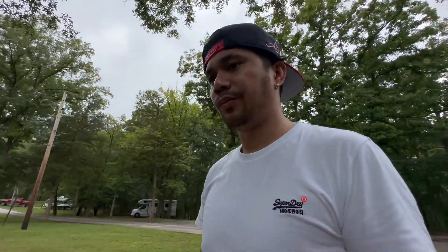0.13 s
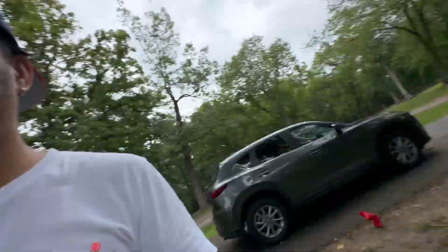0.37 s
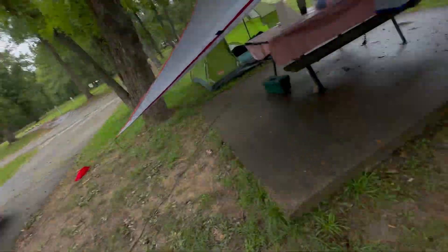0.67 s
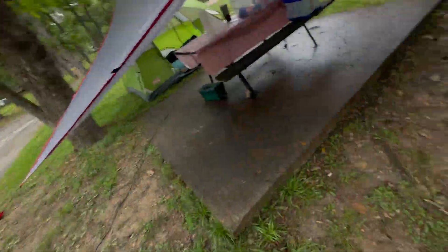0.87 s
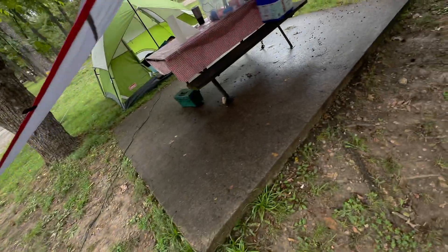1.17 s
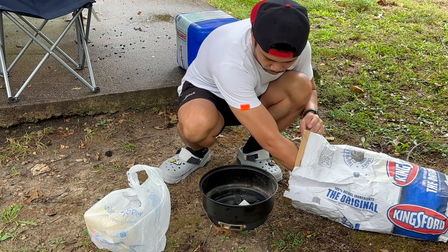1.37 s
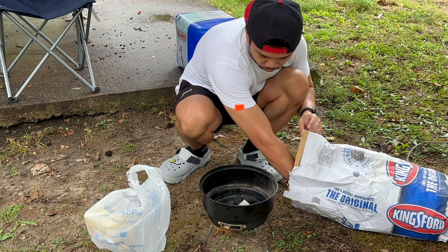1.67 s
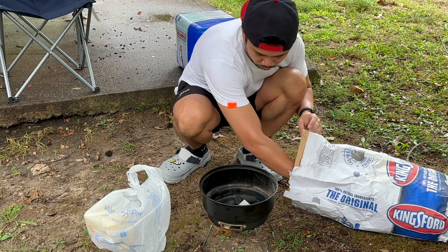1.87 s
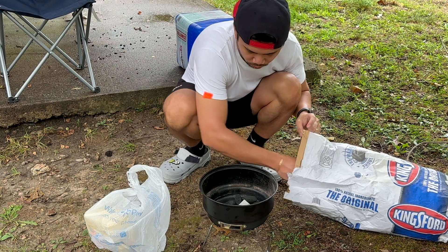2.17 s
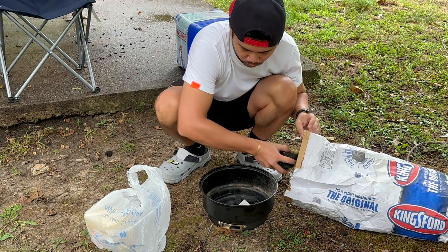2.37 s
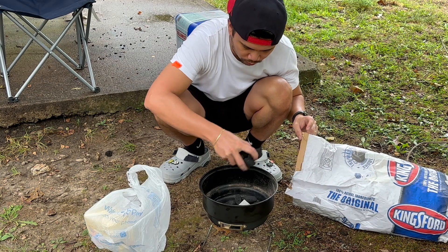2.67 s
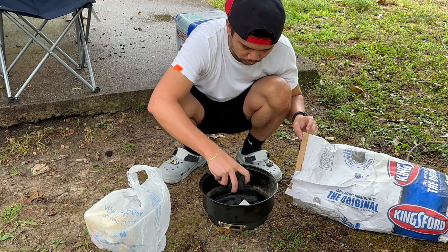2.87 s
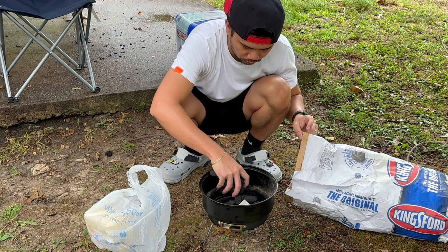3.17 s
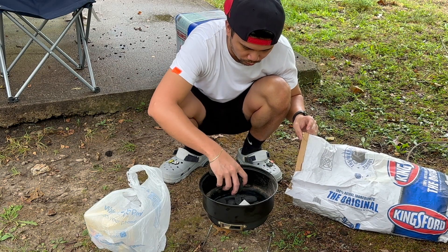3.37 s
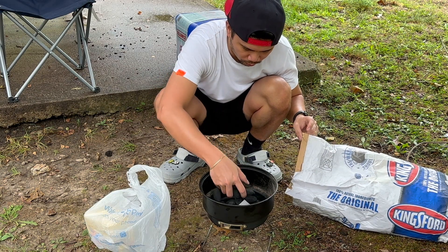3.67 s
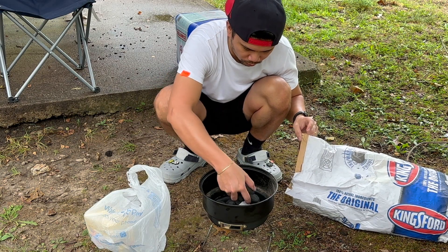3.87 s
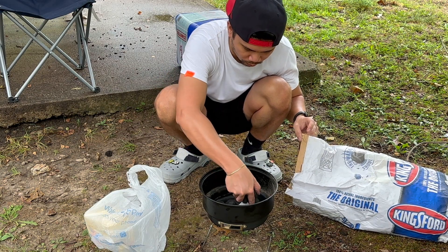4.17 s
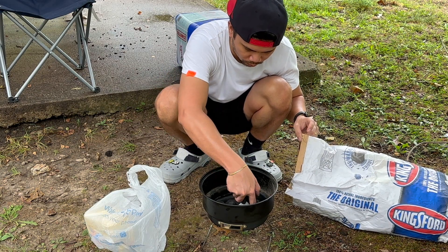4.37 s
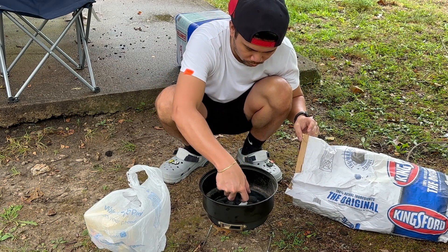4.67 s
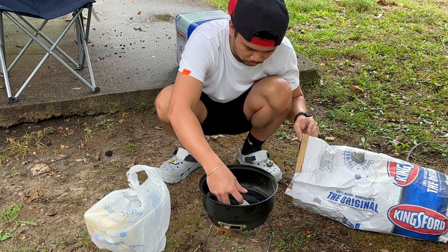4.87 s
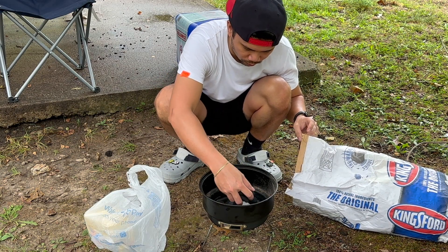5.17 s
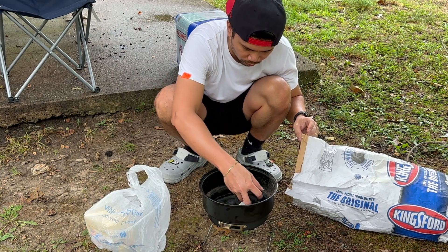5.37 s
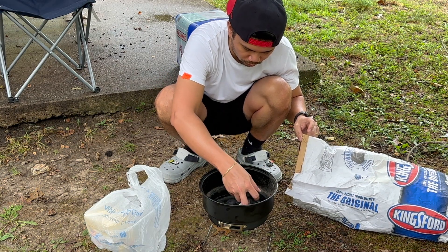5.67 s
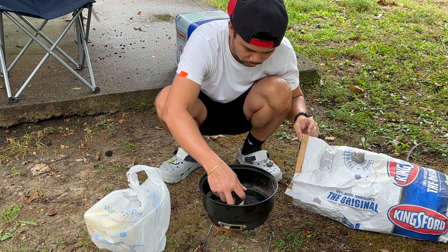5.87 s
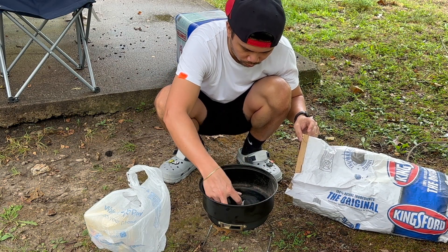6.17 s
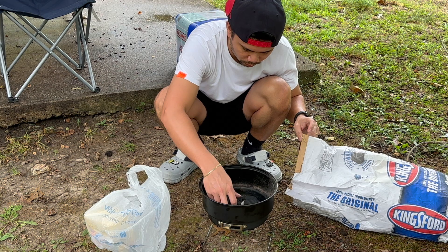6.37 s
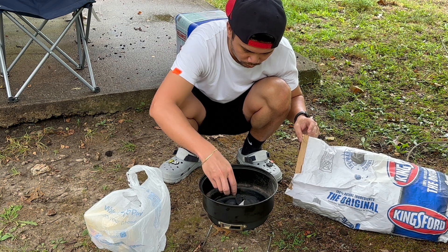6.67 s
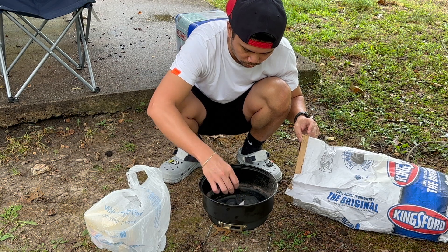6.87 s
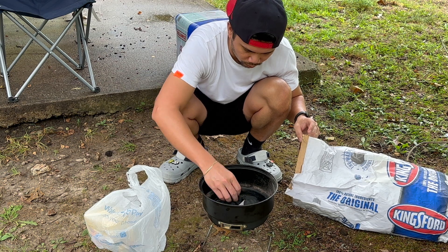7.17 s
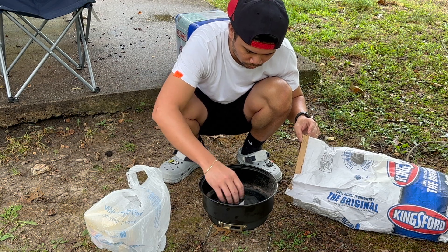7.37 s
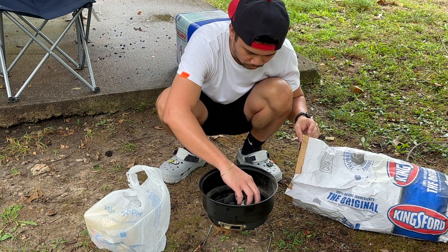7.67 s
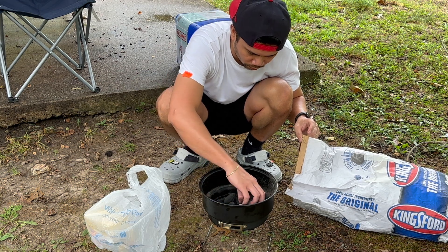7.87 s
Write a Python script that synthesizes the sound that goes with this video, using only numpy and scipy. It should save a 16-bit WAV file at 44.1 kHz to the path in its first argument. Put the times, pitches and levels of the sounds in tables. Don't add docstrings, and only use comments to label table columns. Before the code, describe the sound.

For the first 1.3 seconds, someone walks outdoors: low handling rumble, leafy rustle, soft grass brushes and little ticks of gear, strongest near 0.7. A hard cut at 1.3 brings a close stiff paper sack, crackling in clumps with hollow papery booms, dull coal knocks and a sharp snap near 1.5, until about 2.3. After a quieter gap, charcoal rolls and clatters in a thin steel bowl from 3.0 to 3.9, loudest in a bright clang at 3.6; a wire grate sings on until about 4.5. Muted gritty nudges follow, with a rim scrape at 4.85, then sparse faint touches. Another bright metallic clank comes at 6.75, trailed by small pings and muffled taps to 7.8. Throughout, distant engines hum low; far traffic, moving air and faint insect hiss accompany the grill. Close stereo pickup, open and nearly dry.

```python
import sys
import numpy as np
from scipy import signal
from scipy.fft import rfft, irfft, next_fast_len
from scipy.io import wavfile
from scipy.ndimage import uniform_filter1d, map_coordinates

SR = 44100
rng = np.random.default_rng(int(sys.argv[2]) if len(sys.argv) > 2 else 0)


def waveform_to_disk(signal):
    frames = np.transpose(np.atleast_2d(signal))
    scaled = np.clip(frames, -1, 1) * 32767
    samples = np.round(scaled).astype(np.int16)
    wavfile.write(sys.argv[1], SR, samples)


def voltage_ratio(level):
    return 10 ** (np.asarray(level, float) / 20)


N = 353682

# (time [s], peak [dB])
CHIMES = [(3.144, -45), (3.1747, -43), (3.3213, -33), (3.47, -46), (3.8449, -36), (6.9445, -45.5),
          (7.0404, -47.5), (7.1075, -52), (7.1726, -52)]


def unit(x):
    return x / np.sqrt(np.mean(x ** 2) + 1e-20)


def along(points, hz):
    f, v = np.transpose(points)
    return np.interp(np.log(hz + 1), np.log(f + 1), v)


def curves(rows):
    s, *cols = np.transpose(rows)
    return [np.interp(np.arange(N) / SR, s, c) for c in cols]


def wobble(rate):
    knots = rng.standard_normal(int(N * rate / SR) + 4)
    return map_coordinates(knots, [np.arange(N) * rate / SR])


def filtered(x, response):
    m = next_fast_len(x.shape[-1] + 8192)
    return irfft(rfft(x, m) * response(np.fft.rfftfreq(m, 1 / SR)), m)[..., :x.shape[-1]]


def resonances(modes):
    def response(f):
        return sum((-1) ** k * voltage_ratio(db) * 1j * f * w / (c * c - f * f + 1j * f * w)
                   for k, (c, w, db) in enumerate(modes))
    return response


def stereo(pair, spectrum, alike):
    def colour(hz):
        turn = np.arccos(np.clip(along(alike, hz), -1, 1)) / 2
        return voltage_ratio(along(spectrum, hz)) * [np.cos(turn), np.sin(turn)]
    mid, side = filtered(pair, colour)
    return unit(np.array([mid + side, mid - side]))


def rush(spectrum, alike, patchy_db, size=N):
    z = signal.stft(rng.standard_normal((2, size)), nperseg=512)[2]
    field = uniform_filter1d(rng.standard_normal(z.shape[1:]), 6, 0)
    field = uniform_filter1d(field, 14, 1)
    patches = voltage_ratio(patchy_db * np.clip(unit(field), -2, 2))
    noise = signal.istft(z * patches, nperseg=512)[1][:, :size]
    return np.pad(stereo(noise, spectrum, alike), ((0, 0), (0, N - size)))


def dying(t60s, size, speed):
    hz, t, z = signal.stft(rng.standard_normal(size), SR, nperseg=128)
    decay = voltage_ratio(-60 * speed * t / along(t60s, hz)[:, None])
    return signal.istft(z * decay, SR, nperseg=128)[1][:size]


def ring(modes, t, damping, scatter_db, split):
    hz, db, t60 = np.repeat(np.transpose(modes), 2, axis=1)[:, :, None]
    luck = rng.standard_normal((3, len(hz), 1))
    level = voltage_ratio(db - 8 + scatter_db * luck[0] - 60 * t * damping / t60)
    return np.sum(level * np.sin(2 * np.pi * hz * (1 + split * luck[2]) * t + luck[1]), 0)


def tone(hz, waver):
    phase = 2 * np.pi * np.cumsum(hz * np.ones(N)) / SR
    return np.sqrt(2) * np.sin(phase + waver * wobble(6))


def knocks(rows, crack):
    out, t = np.zeros(N + 2000), np.arange(2000) / SR
    for s, db, hz, life in rows:
        burst = crack * uniform_filter1d(rng.standard_normal(len(t)), size=4) * np.exp(-t / 0.0013)
        sine = np.sin(2 * np.pi * hz * t) * np.exp(-t * hz / life)
        out[round(s * SR):][:len(t)] += voltage_ratio(db) * (sine + burst)
    return out[:N]


def strokes(rows, rise, fall):
    t = np.arange(N) / SR
    return sum(voltage_ratio(db - rise * np.maximum(s - t, 0) - fall * np.maximum(t - s - hold, 0))
               for s, hold, db in rows)


def bowl():
    # (time [s], clatter peak [dB], floor drum [dB], thud [dB], brightness [dB per octave])
    drops = [(3.3844, -33.5, -31.5, -36.5, -5), (3.1774, -46, -57, -55, 2), (3.1944, -56, -46, -73, 0),
             (3.3194, -24.5, -25.5, -36.5, -0.5), (3.455, -29.5, -38.5, -44.5, -2.5),
             (3.5947, -4, -22.5, -26.5, 0.5), (3.6054, -17.5, -25, -26, 1), (3.6159, -22.5, -31, -30.5, 1),
             (3.8442, -22.5, -34, -34, 0.5), (6.9424, -41, -51.5, -55, 1),
             (3.698, -35.5, -32.5, -55.5, -4.5), (6.7698, -25, -35.5, -51, 6.5),
             (6.8067, -27.5, -52, -52, 1), (6.834, -29, -49, -57, 3)]
    clangs = [(3.1404, -27.5, -34.5, -36.5, 3), (3.1624, -48, -51, -45, -2),
              (3.3334, -20.5, -34, -27.5, 6.5), (3.6264, -24.5, -17, -29.5, -1.5),
              (6.7456, -11.5, -24, -29, -2), (6.7544, -16, -16.5, -39, 0.5)]
    rolls = [(3.2884, -20, -33, -41, -4), (3.2977, -32, -35, -51, -3.5), (3.3119, -20, -33, -43, -3.5),
             (3.038, -51, -55, -47.5, 7), (3.8796, -37.5, -49, -36.5, -1.5), (3.8994, -56, -46, -39, 5),
             (7.0369, -43.5, -56, -70.5, 1), (7.0998, -43, -52.5, -47.5, 0), (7.1696, -42, -52, -59, 0)]
    # (time [s], clatter peak [dB], floor drum [dB], thud [dB])
    nudges = [(3.1078, -47, -56, -44.5), (3.4294, -47.5, -40.5, -45.5), (4.4478, -43.5, -44.5, -45.5),
              (4.5144, -46.5, -52, -48), (4.5526, -43.5, -42, -42.5), (4.5914, -48, -49, -49),
              (4.6294, -68.5, -59, -56), (4.6994, -71, -53, -48.5), (4.812, -59, -42, -46.5),
              (4.9955, -52.5, -58, -47.5), (5.025, -47, -48.5, -46), (5.0424, -41.5, -43, -66),
              (5.5159, -54.5, -60, -58), (5.7464, -35.5, -44, -33), (6.2194, -68.5, -52.5, -52.5),
              (6.5994, -65, -59, -55), (6.7214, -26.5, -35, -36), (7.1864, -54.5, -44, -40),
              (7.21, -52, -46.5, -42), (7.2494, -58, -54, -65), (7.3871, -36.5, -42.5, -35),
              (7.4991, -66.5, -57.5, -51.5), (7.5244, -72, -50, -45), (7.8284, -58.5, -43.5, -58)]
    # (time [s], clatter peak [dB], floor drum [dB], thud [dB])
    slips = [
        (4.8494, -29, -38.5, -36.5),
        (5.453, -50, -60, -55),
    ]
    # (contacts, damping of the wall, treble [dB], hiss [dB])
    touches = [(drops, 1, 3.6, -3.5), (clangs, 1, 2.2, -5), (rolls, 1, -2.5, -6),
               (nudges, 2.2, -7, -6), (slips, 1.86, 11, -6)]
    # (damping of the floor, strong wall modes [dB])
    grips = [(1.1, 0), (0.67, -1.5), (1.1, -2.5), (5.3, -5.5), (3.7, 0)]
    grabs = [2.8, 5.8, 2.4, 4.7, 6.885, 7.26, 9]
    size = SR // 3
    out, t = np.zeros(N + size), np.arange(size) / SR
    waves, loss_db = mesh(t, count=110)
    for (rows, damping, treble_db, hiss_db), (muffle, wall_db) in zip(touches, grips):
        fine = (waves * voltage_ratio(damping * loss_db)).reshape(-1, size)
        for s, db, drum_db, thud_db, *tilt_db in rows:
            clatter = rattle(t, fine, damping, hiss_db, wall_db, treble_db, sum(tilt_db))
            clatter *= voltage_ratio(db - 12.5) * (1 - np.exp(-t / 0.00028))
            hit = clatter + drum(t, s, drum_db, damping, muffle) + thud(t, thud_db)
            grabbed = np.maximum(s + t - min(g for g in grabs if g > s), 0)
            fade = voltage_ratio(-230 * grabbed) * np.clip((size / SR - t) / 0.11, 0, 1)
            out[round(s * SR):][:size] += fade * hit
    return out[:N] + pings()


def steel_colour(hz):
    # (frequency [Hz], level [dB per Hz])
    clatter = [(740, -46), (1250, -3.5), (2130, -4.5), (2750, -9.5), (3500, -11.5), (5620, -22),
               (7420, -25), (8350, -24), (10100, -31), (11200, -26), (13000, -24), (16000, -35)]
    # (frequency [Hz], width [Hz], level [dB])
    crowds = [(2120, 90, 12), (2330, 110, 6), (3000, 90, 13), (3480, 150, 8), (4110, 150, 10),
              (4500, 200, 6), (5550, 250, 8), (6900, 300, 5)]
    peaks = sum(voltage_ratio(db) / (1 + ((hz - c) / w * 2) ** 2) for c, w, db in crowds)
    return voltage_ratio(along(clatter, hz)) * (1 + peaks)


def mesh(t, count):
    hz = 1200 + 9000 * rng.random(count)[:, None] ** 1.5
    spread = np.clip(rng.standard_normal(count), -1.5, 1.5)[:, None]
    t60 = 0.27 * np.exp(0.25 * spread)
    gain = steel_colour(hz) * np.sqrt(hz)
    waves = np.array([np.sin(2 * np.pi * hz * t), np.cos(2 * np.pi * hz * t)])
    return gain / np.linalg.norm(gain) * waves, -60 * t / t60


def rattle(t, fine, damping, hiss_db, wall_db, treble_db, tilt_db):
    # (frequency [Hz], t60 [s])
    clatter_t60 = [(1000, 0.031), (2000, 0.2), (4500, 0.19), (8000, 0.39), (13000, .2)]
    # (frequency [Hz], level [dB], t60 [s])
    wall = [(1870, -14, .1), (2118, -5, .22), (2310, -16, .3), (2417, -24, .5), (2686, -24, .4),
            (2995, -7, .2), (3130, -18, .25), (3348, -14, .22), (3505, -14, .14), (3980, -14, .12),
            (4050, -11, .22), (4107, -4, .1), (4210, -17, .45), (4445, -18, .5), (4640, -26, .5),
            (4786, -19, .12), (5195, -23, .2), (5389, -24, .27), (5560, -18, .18), (5835, -23, .22),
            (6390, -26, .22), (6874, -27, .25), (8096, -20, .1), (8274, -25, .22), (8651, -26, .2),
            (13200, -24, .16)]
    grains = voltage_ratio(3.5 * map_coordinates(rng.standard_normal(len(t)), [t * 300]))
    hiss = filtered(grains * dying(clatter_t60, len(t), damping), steel_colour)
    out = voltage_ratio(hiss_db) * hiss / np.std(hiss[:500])
    out += voltage_ratio(-6) * rng.standard_normal(len(fine)) @ fine
    out += voltage_ratio(wall_db) * ring(wall, t, 0.9 * damping, scatter_db=1, split=.002)

    def brightness(hz):
        treble = treble_db * np.clip(np.log2((hz + 1) / 3500), 0, 1)
        return voltage_ratio(treble + tilt_db * np.clip(np.log2((hz + 1) / 3000), -1, 1.5))
    return filtered(out, brightness)


def drum(t, s, peak_db, damping, muffle):
    # (frequency [Hz], level [dB], t60 [s])
    floor = [(964.6, -0.5, 0.12), (985.6, -4.5, 0.24), (1023, -3, 0.28), (1075, -5, 0.06)]
    # (time [s], modes above 1 kHz [dB])
    load = [(3, 12), (3.3, 5), (3.55, 8), (3.6, -6.5), (3.8, -1.5), (4.5, -1), (6.7, -30), (7.1, -3)]
    load_db = np.interp(s, *np.transpose(load))
    out = sum((-1) ** k * voltage_ratio(db + (hz > 1000) * load_db - 60 * t * muffle / t60) * np.sin(2 * np.pi * hz * t)
              for k, (hz, db, t60) in enumerate(floor))
    out *= 1 - np.exp(-t * damping / 0.001)
    return out * voltage_ratio(peak_db + 2.5) / np.max(np.abs(out))


def thud(t, db):
    # (frequency [Hz], width [Hz], level [dB])
    coal = [(537, 63, -2.5), (621, 130, -6), (895, 850, -7), (1100, 610, -3.5), (1800, 590, -15),
            (2590, 160, -24)]
    body = [(hz * (1 + 0.039 * rng.standard_normal()), w, level + 3 * rng.standard_normal())
            for hz, w, level in coal]
    grit = rng.standard_normal(len(t)) * t / 0.0036 * np.exp(-t / 0.0029)
    push = uniform_filter1d(uniform_filter1d(grit, size=10), size=14)
    return voltage_ratio(db + 34) * filtered(push, resonances(body))


def pings():
    # (time [s], peak [dB])
    rivet = [(3.3154, -52.5), (3.3323, -50.5), (3.3842, -48), (3.5957, -33.5), (3.6162, -30.5),
             (3.8442, -44), (4.8539, -45), (6.7246, -66.5), (6.7456, -36.5), (6.77, -35), (6.8069, -31),
             (6.9411, -67), (7.0354, -68), (7.0993, -74), (7.1676, -80)]
    rows = [(s, db - 0.5, 13100, 90) for s, db in rivet]
    rows += [(s, db - 2, 4110, 40) for s, db in CHIMES]
    rows += [(3.586, -41, 1690, 8)]
    return knocks(rows, crack=0)


def grate():
    # (frequency [Hz], level [dB rms])
    wires = [(947.5, -59.5), (1437, -74), (1960, -63), (2256, -69.5), (2304, -64.5), (2326, -71),
             (2686, -76.5), (4215, -85), (4646, -79)]
    # (struck [s], damped [s], level [dB])
    rings = [
        (3.591, 4.458, 5.5),
        (4.456, 4.853, -8),
        (6.744, 7.195, -28),
    ]
    t = np.arange(N) / SR
    song = sum(voltage_ratio(db) * tone(hz, waver=.2) for hz, db in wires)
    gain = sum(voltage_ratio(db - 20 * (t - on)) * (t > on) * np.clip((off - t) / 0.017, 0, 1)
               for on, off, db in rings)
    return song * gain


def hollow():
    # (time [s], peak [dB])
    answers = [(3.139, -38.5), (3.334, -31), (3.597, -25), (3.621, -26), (4.554, -42), (4.851, -35.5),
               (4.999, -51), (5.748, -39.5), (7.188, -39), (7.21, -44)]
    return knocks([(s, db - 2.5, 530, 4) for s, db in answers], crack=0)


def second_wire():
    return knocks([(s, db, 2960, 30) for s, db in CHIMES], crack=0)


def sack():
    # (time [s], hold [s], crackle [dB], boom of the paper [dB])
    digs = [(1.337, 0.038, -62.5, -35.5), (1.386, 0.019, -54.5, -36.5), (1.454, 0.03, -52, -31),
            (1.569, 0.023, -57.5, -39.5), (1.657, 0.049, -55, -39.5), (1.788, 0.041, -60.5, -47),
            (1.878, 0.021, -68.5, -64), (1.949, 0.016, -65.5, -41), (2.011, 0.112, -62, -51),
            (2.166, 0.0043, -56, -38.5), (2.214, 0.026, -57, -59), (2.295, 0.042, -69, -67)]
    # (frequency [Hz], level [dB per Hz])
    paper = [(590, -38), (1000, -0.5), (1480, -1.5), (2100, -7.5), (2940, -8.5), (6040, -16.5), (7530, -19),
             (8550, -20), (11200, -27.5), (13100, -24.5), (16000, -28)]
    # (time [s], snap [dB], knock of coals [dB], knock frequency [Hz])
    snap_events = [(1.337, -48, -42, 294), (1.375, -44, -50, 310), (1.4066, -53, -47, 453),
                   (1.441, -53.5, -47, 493), (1.4676, -24, -34, 390), (1.4899, -51, -53, 410),
                   (1.511, -47, -37, 306), (1.5719, -41, -46.5, 297), (1.6356, -51.5, -42, 570),
                   (1.6706, -50, -47, 604), (1.8126, -47, -66, 310), (1.895, -51, -61, 307),
                   (1.9463, -56, -34.5, 790), (1.9641, -55, -35.5, 314), (2.01, -50, -49, 313),
                   (2.08, -39.5, -50, 328), (2.1107, -40, -46, 460), (2.1649, -34.5, -39, 303),
                   (2.2395, -36, -38, 374)]
    rise, crease_fall, boom_fall = 830, 421, 236
    crease = strokes([row[:3] for row in digs], rise, crease_fall)
    swing = strokes([(s, hold, db) for s, hold, _, db in digs], rise, boom_fall)
    size = 3 * SR
    clumps = voltage_ratio(2.5 * wobble(130))

    strength = voltage_ratio(2.9 * np.minimum(rng.exponential(size=size), 3))
    grains = (rng.random(size) < 2500 / SR) * strength * rng.standard_normal((2, size))
    crackle = clumps[:size] * (unit(grains) + 1.1 * rng.standard_normal((2, size)))
    crackle = stereo(crackle, paper, [(600, 1.0), (1300, 0.68), (3000, 1.0), (12000, 0.75)])
    crackle = np.pad(crackle, ((0, 0), (0, N - size)))

    boom_spectrum = [(60, -70), (150, -20), (250, 2.5), (500, -2), (1000, -7.5), (1800, -43.0), (5000, -79.5)]
    boom = rush(boom_spectrum, [(300, 0.98)], patchy_db=1.5, size=size)
    boom = clumps * voltage_ratio(1.1 * wobble(90) - 4) * boom

    snaps = knocks([(s, db - 0.5, 1460, 1.6) for s, db, _, _ in snap_events], crack=0.58)
    snaps += knocks([(s, db + 1.5, hz, 3) for s, _, db, hz in snap_events], crack=0)
    snaps += knocks([(1.4672, -19.5, 810, 1.1), (2.1648, -42, 2980, 12), (2.214, -48, 4400, 20)], crack=0.08)
    snaps = filtered(snaps, lambda hz: 1j * hz / (220 + 1j * hz))
    return voltage_ratio(5) * crease * crackle + voltage_ratio(-5) * swing * boom + snaps


def creases():
    # (time [s], peak [dB], frequency [Hz])
    crackles = [(1.3214, -54, 1670), (1.3398, -51, 1330), (1.3603, -43, 1350), (1.3762, -42, 1300),
                (1.4466, -34, 1420), (1.467, -29, 1240), (1.5119, -41, 1380), (1.5503, -44, 1240),
                (1.5628, -45, 1500), (1.6351, -40, 1260), (1.6706, -34, 1300), (1.7868, -56, 1420),
                (1.8107, -44, 1230), (1.894, -42, 3540), (1.9484, -43, 1490), (2.0093, -42, 1260),
                (2.0781, -48, 1430), (2.1106, -45, 1310), (2.1684, -37, 1360), (2.2093, -46, 1570)]
    return knocks([(s, db - 3.5, hz, 2.5) for s, db, hz in crackles], crack=0.27)


def walk():
    # (time [s], level [dB])
    pace = [
        (0, 1),
        (.55, 2),
        (.8, -0.5),
        (1.33, 0),
    ]
    # (time [s], hold [s], level [dB])
    steps = [
        (0, 0.024, -58),
        (.5, 0.061, -63.5),
        (.614, .004, -61.5),
        (.704, 0.012, -59.5),
        (1.284, 0.004, -67),
    ]
    # (frequency [Hz], likeness)
    walk_alike = [(60, 0.91), (200, 0.38), (400, 0), (1000, 0), (15000, 0)]
    # (frequency [Hz], level [dB per Hz])
    leaf_spectrum = [(150, -24), (250, 0.5), (319, -6), (347, -9.5), (458, -9.5), (615, -6.5), (745, -3),
                     (1300, -13.5), (1440, -10), (2380, -24), (4360, -34), (6840, -27.5), (10300, -47),
                     (11300, -60), (12300, -54), (15700, -67)]
    # (frequency [Hz], level [dB per Hz])
    grass_spectrum = [(1180, -32), (2000, 8.5), (2220, 7.5), (3060, 4.5), (4630, -0.5), (8260, -3),
                      (11300, -23), (13500, -17), (15800, -14.5)]
    # (time [s], peak [dB], frequency [Hz], share of the overtone [dB])
    gear = [(0.098, -60, 600, 15), (0.372, -46, 820, -5), (0.619, -52, 740, -5.5), (0.709, -32.5, 903, 0),
            (0.729, -43, 970, -10.5), (0.765, -44, 880, -0.5), (0.86, -46, 870, -9), (0.922, -44, 757, -27),
            (1.009, -61, 460, 9), (1.213, -60, 832, -23), (1.284, -41.5, 760, -7)]
    size = 2 * SR
    pace_db, = curves(pace)
    rumble_spectrum = [(25, -28), (40, -8), (58, 0), (100, -6), (150, -7), (300, -14), (450, -40), (900, -120)]
    rumble = voltage_ratio(.8 * wobble(9)) * rush(rumble_spectrum, walk_alike, patchy_db=.6, size=size)
    rumble *= voltage_ratio(-50.5 + pace_db)
    leaves = voltage_ratio(-54.5 + 0.82 * pace_db) * rush(leaf_spectrum, walk_alike, patchy_db=2.0, size=size)
    grass = voltage_ratio(1.2 * wobble(30)) * rush(grass_spectrum, walk_alike, patchy_db=1.2, size=size)
    grass *= voltage_ratio(-72.5 + 2.8 * pace_db) + strokes(steps, rise=2400, fall=1100)
    ticks = knocks([(s, db + high, 2.38 * low, 4) for s, db, low, high in gear], crack=0.5)
    ticks += knocks([(s, db, low, 4) for s, db, low, _ in gear], crack=0)
    buckles_and_zips = [(.183, -58, 6800, 1.5), (.245, -48, 2410, 2.7), (.307, -58, 4000, 1.5),
                        (.548, -56, 2300, 2.5), (.721, -57, 13500, 1.5), (.094, -56, 14900, 13),
                        (1.286, -49, 4500, 1.2)]
    ticks += knocks(buckles_and_zips, crack=0)
    return rumble + leaves + grass + ticks


def trees(x):
    # (frequency [Hz], t60 [s])
    tail_t60 = [(300, 0.74), (2000, 0.15), (10000, 0.16)]
    tails = np.array([dying(tail_t60, SR // 3, speed=0.66) for _ in "LR"])
    late = np.pad(x, (300, 0))[None]
    return signal.fftconvolve(late, tails / np.linalg.norm(tails[0]), axes=1)[:, :N]


def engines():
    # (frequency [Hz], level [dB rms])
    generator = [(108, -61.5), (242, -63.5), (318, -64.5), (560, -81)]
    # (time [s], hold [s], level [dB rms], frequency [Hz])
    drones = [
        (0, 0.16, -54, 143.8),
        (0.505, 0.082, -54, 144.7),
        (1.951, 1.2, -53.5, 175),
        (5.201, 0.57, -62, 187),
    ]
    hum = sum(voltage_ratio(db + 1.2 * wobble(3.5)) * tone(hz, waver=.45) for hz, db in generator)
    for *row, hz in drones:
        gain = strokes([row], rise=19, fall=16) * voltage_ratio(.8 * wobble(9.7))
        hum = hum + gain * tone(hz + 1.4 * wobble(1.8), waver=0.25)
    return hum


def camp():
    # (time [s], level [dB])
    distance = [
        (1.3, -50),
        (2.4, -52.5),
        (4.5, -55),
        (8, -53.5),
    ]
    # (frequency [Hz], level [dB per Hz])
    traffic_spectrum = [(15, -56), (25, -52), (46, -1), (103, 2.5), (145, -1), (247, -7.5), (284, -6.5),
                        (320, -12), (420, -19.5), (550, -57), (920, -120)]
    # (frequency [Hz], level [dB per Hz])
    air_spectrum = [(210, -41.5), (350, -11), (584, -1.5), (685, -4), (804, -6.5), (1010, -15.5),
                    (1730, -10), (3280, -23.5), (4520, -30.5), (5660, -37.5), (6750, -27.5), (7430, -31),
                    (8040, -36.5), (11100, -50.5), (16000, -40.5)]
    # (frequency [Hz], likeness)
    camp_alike = [(60, 1), (150, 0.87), (380, 0.56), (950, 0.044), (2380, 0.27), (5980, 1), (7700, 0.95),
                  (15000, 0.0036)]
    traffic_db, = curves(distance)
    traffic = voltage_ratio(traffic_db + .7 * wobble(5)) * rush(traffic_spectrum, camp_alike, patchy_db=.6)
    air = voltage_ratio(-62 + 0.34 * wobble(3.7)) * rush(air_spectrum, camp_alike, patchy_db=1.5)
    return traffic + air


def scene():
    # (frequency [Hz], left leads [radians])
    lead = [(300, .1), (1150, .3), (1600, 1.1), (1900, .2), (3000, .65), (6800, .3), (7450, np.pi),
            (8000, 5.8), (9400, 5.8), (10400, 3.3), (11800, 2.9), (13900, .2)]
    steel = bowl() + grate()
    grill = steel + voltage_ratio(-18.5) * trees(steel) + sack() + camp()
    grill = grill + hollow() + second_wire() + creases()
    grill = filtered(grill, lambda hz: np.exp(.5j * along(lead, hz) * np.array([[1], [-1]])))
    walking = np.arange(N) < 1.333 * SR
    return np.where(walking, walk(), grill) + engines()


def top_cut(x):
    return signal.sosfilt(signal.butter(12, 16720, fs=SR, output="sos"), x)


def record(dry):
    mix = filtered(dry, lambda hz: np.where(hz < 15900, 1, voltage_ratio(-45.5)))
    return top_cut(mix)


dry = scene()
out = record(dry)
waveform_to_disk(out)
```